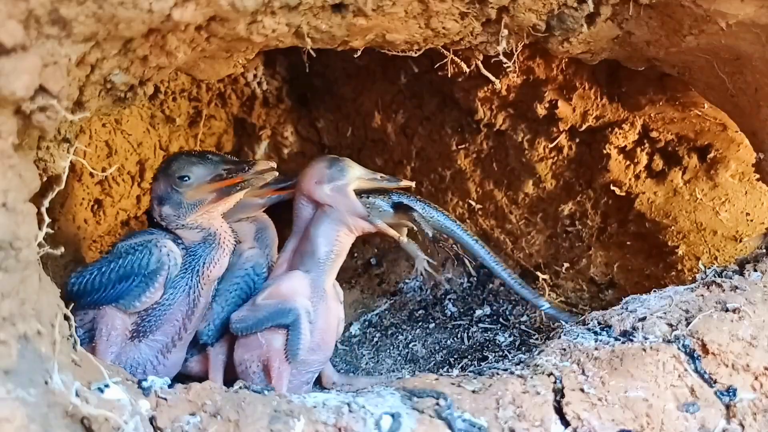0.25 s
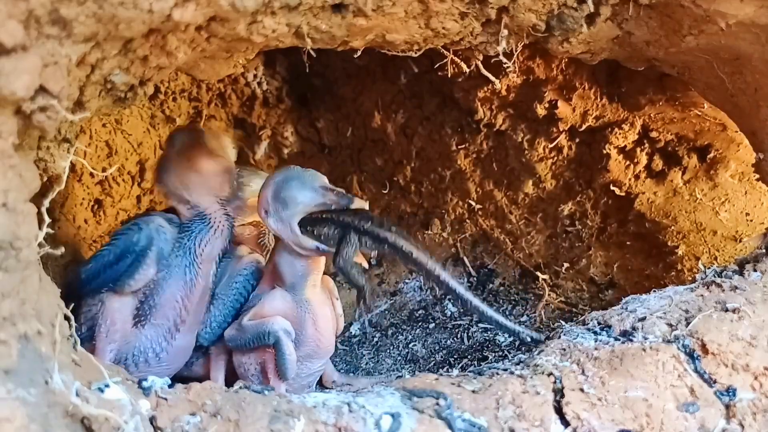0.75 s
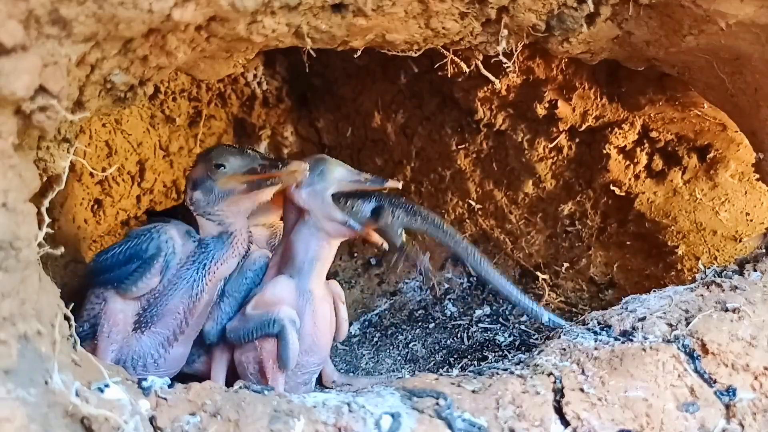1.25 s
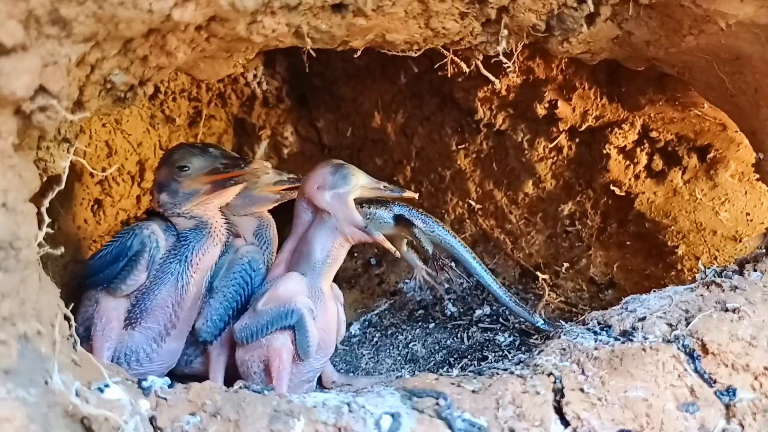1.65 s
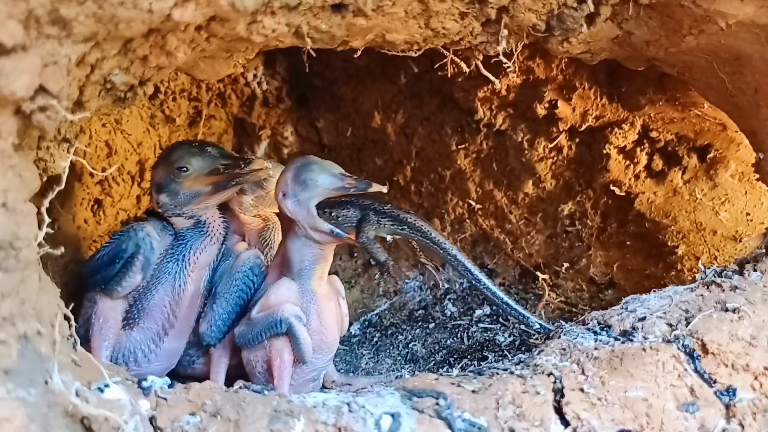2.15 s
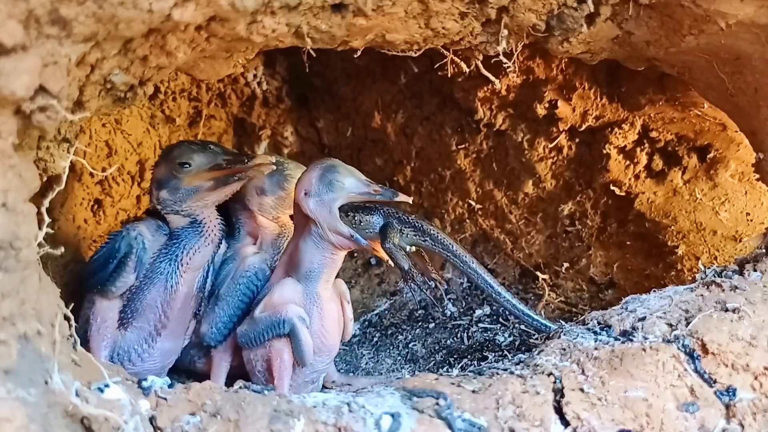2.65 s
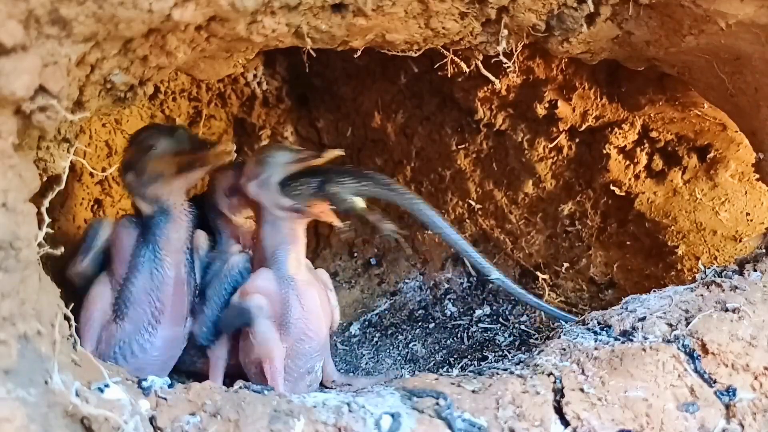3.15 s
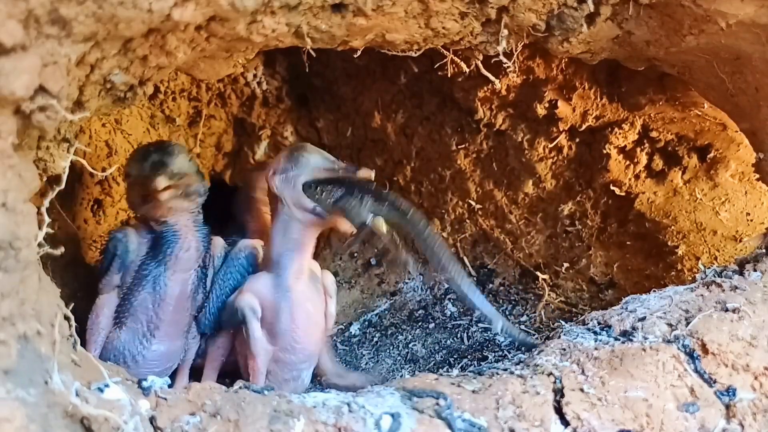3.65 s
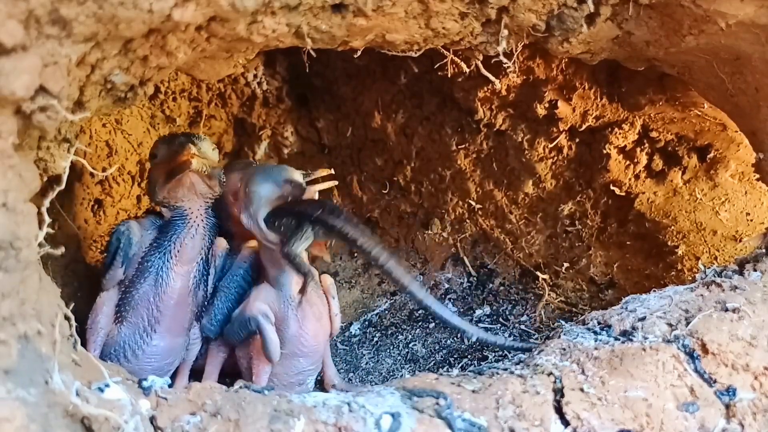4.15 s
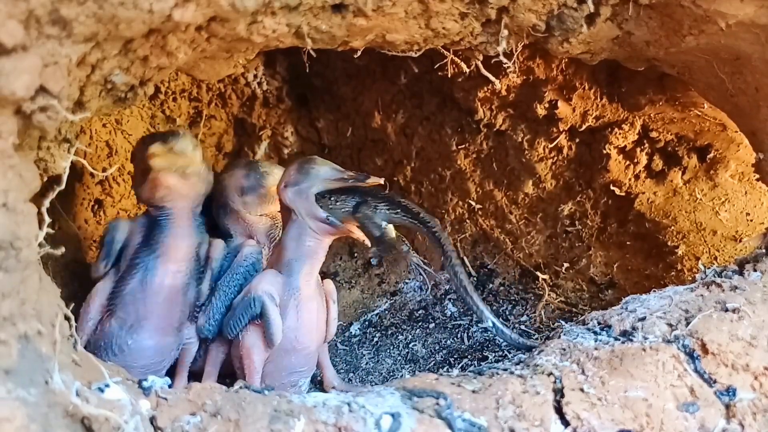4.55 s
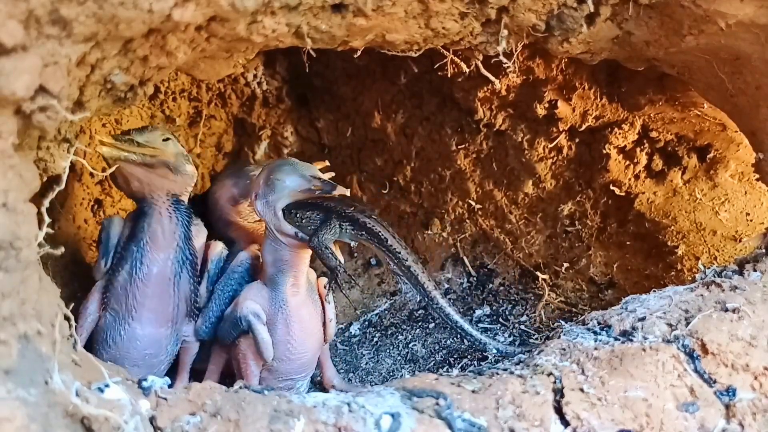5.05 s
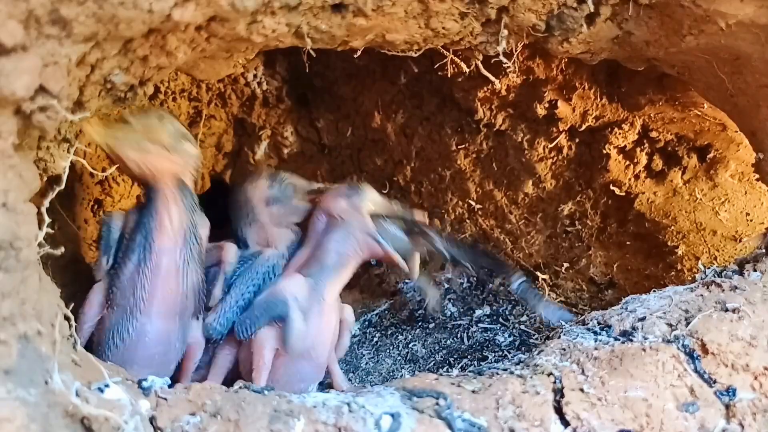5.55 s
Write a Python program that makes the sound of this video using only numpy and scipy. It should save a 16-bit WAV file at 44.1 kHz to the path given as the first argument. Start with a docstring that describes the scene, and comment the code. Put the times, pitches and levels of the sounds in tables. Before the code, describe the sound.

A close, wide outdoor stereo pickup of two or three young birds begging in an earth burrow. From 0 to about 1.5 seconds their shrill, hoarse whistles overlap in a dense, nearly unbroken chatter, with a more sustained buzzy squeal around 0.6 to 0.9. From 1.7 onward the calls become short, rasping chirps that leap up and fall, repeated several times a second with small gaps, crowding together again around 3 to 3.6 seconds and near the end. Breathy noise clings to each cry, and the walls add only a tiny, dry tail. A faint tap comes at 1.0, a clearer dull double bump near 3.0 to 3.2, and lighter touches at 4.3 and 5.2. Underneath, soft air and a low, uneven engine throb persist; the rumble rises after 3 seconds and is strongest at the close, about 5.8. Faint distant hoots appear at 3.1 to 3.6 and after 5.

```python
"""Begging nestlings in an earth burrow

Two or three hoarse, warbling, kingfisher-like whistles overlap in bursts: gliding harmonic tones,
modulated by narrow-band noise and weighted by the throat. Coloured breath noise follows their loudness,
and a short diffuse tail stands for the earth walls. Damped sines are bodies bumping the soil;
outside are an engine of pulses ringing resonances, a far bird's gliding sine hoots and steady air noise."""
import sys
import numpy as np
from scipy import signal
from scipy.fft import rfft, irfft, next_fast_len
from scipy.io import wavfile
from scipy.ndimage import uniform_filter1d

SR = 44100
rng = np.random.default_rng(int(sys.argv[2]) if len(sys.argv) > 2 else 0)


def wav_record(signal):
    """Record a signal, one row per channel, as 16-bit PCM in the file named by sys.argv[1]."""
    frames = np.transpose(np.atleast_2d(signal))
    bounded = np.clip(frames, -1, 1)
    # unit amplitude maps onto the largest positive 16-bit level
    quanta = np.round(bounded * 32767).astype(np.int16)
    wavfile.write(sys.argv[1], SR, quanta)


N = 255339

# Outside air. Each row: frequency in Hz, relative density in dB per Hz.
AIR_SPECTRUM = [(20, -8), (60, 3.5), (300, -13), (500, -13), (2000, -23), (5000, -20.5), (8000, -35.5),
                (16000, -22)]
AIR_DB = -53.5

# Engine loudness. Each row: time in seconds, level in dB before swell and stereo weights.
ENGINE_LEVEL = [(0, -46), (.9, -47.5), (1.3, -51.5), (2, -46), (2.5, -48), (3.3, -41.5), (4.2, -40.5),
                (5.2, -43), (5.79, -36)]
# Exhaust resonances. Each row: frequency in Hz, bandwidth in Hz, relative gain in dB.
EXHAUST_MODES = [(59, 9.6, -6.5), (79, 36, -5), (111.2, 19.7, -3), (132.6, 3.7, 6), (152.9, 11.6, -1.5),
                 (204, 40, -7), (297, 117, -15)]
FIRING_HZ = 26.1  # mean rate
SURGE_DB, MISFIRE_DB = 2.0, 4.0  # rms spread of the slow swell and from pulse to pulse

# Far bird. Each row: start in seconds, end in seconds, first Hz, last Hz, level in dB.
HOOTS = [(3.058, 3.115, 1160, 980, -46), (3.36, 3.394, 980, 990, -46), (3.523, 3.573, 1093, 1085, -51),
         (5.146, 5.212, 1050, 1114, -53), (5.057, 5.11, 955, 1120, -52), (5.25, 5.278, 980, 960, -54),
         (5.396, 5.44, 950, 1000, -54), (5.487, 5.54, 947, 1250, -47), (5.644, 5.706, 1073, 1080, -49.5)]
# Contacts with the soil. Each row: start in seconds, envelope peak in dB, pitch in Hz.
BUMPS = [(1.0, -37, 1450), (2.953, -35, 483), (3.133, -29, 266), (3.187, -39, 1454), (4.285, -39.5, 420),
         (5.239, -44, 1360)]

# Burrow mouth to two microphone ports. Each row: frequency in Hz, left minus right in dB,
# lag of the left in radians.
PORT_RESPONSE = [(106.2, -3, .1), (520, -2.5, 2.2), (1120, 3.5, 3.77), (2050, 1, 3.45), (2800, -6, 1.92),
                 (3240, -1.5, 2.69), (3340, 9, 0.38), (4100, 10.5, 1.5), (4590, 1.5, 1.41),
                 (5480, 2.5, 0.98), (6460, -2.5, 2.28), (11200, 3, 2.74)]
BURROW_T60_S, BURROW_DB = 0.05, -8.5  # decay time of the tail, its gain against the direct sound

# Breath against the loudness of the voices. Each row: time in seconds, hoarse part in dB,
# thin hiss in dB, low rasp in dB.
BREATH_LEVELS = [(0, -1, -30.5, -31), (.55, -6, -23.5, -48), (.62, -15.5, -43, -50), (.75, -17, -38, -21),
                 (.95, -15, -71.5, -41.5), (1.4, -13, -27, -55), (2, -6, -27.5, -59), (2.7, -6, -28, -46.5),
                 (3.4, -3, -41, -38.5), (4, -6, -31, -47.5), (4.6, -8, -34, -48), (5.25, -4, -27, -42.5),
                 (5.79, 0.5, -40.5, -31.5)]
# Thin hiss. Each row: frequency in Hz, relative density in dB per Hz.
HISS_SPECTRUM = [(5000, -12), (6500, 6), (8200, -8), (9500, -13.5), (11800, 4), (13500, -7.5), (15800, -2)]
# Low rasp. Each row: frequency in Hz, relative density in dB per Hz.
RASP_SPECTRUM = [(400, -14), (600, -1), (1500, -1), (2200, 5), (2800, -16), (5500, -2.5), (8300, -7.5),
                 (8900, -37.5)]
# Rms level spread and corner frequency of each kind of breath.
HOARSE_GRAIN_DB, HOARSE_GRAIN_HZ = 3.5, 250
GUST_DB, GUST_HZ = 3.5, 23
RASP_GUST_DB, RASP_GUST_HZ = 2, 15

# Throat and open bill. Each row: frequency in Hz, gain in dB.
THROAT = [(1600, -35), (2100, -14), (2500, -10.5), (2800, -1), (3100, 3), (3400, -1.5), (3650, 2),
          (3900, -1.5), (4150, -11.5), (4450, 1.5), (4750, -6), (5100, -8.5), (5500, -14.5), (6100, -21),
          (7000, -21), (9500, -31), (11200, -34), (12200, -16.5), (13300, -71.5), (16000, -43)]
# Arches of the voice; one that starts near the end of the row above carries the same whistle on.
# Each row: start, top and end in seconds, first, top and last pitch in Hz, fundamental level at the top
# and at the end in dB, octave level in dB; levels are before pitch-dependent gains and the throat.
ARCHES = [ (0.005, 0.05, .101, 2660, 3787, 2477, -30.5, -19.5, -14),
          (0.107, 0.161, .216, 2490, 3617, 2668, -29, -22, -18.5),
          (0.212, 0.272, .33, 2668, 3923, 3527, -21.5, -30.5, -25),
          (0.329, 0.322, .368, 3600, 3690, 1980, -36, -21.5, -23),
          (.032, 0.032, .075, 3900, 3844, 3360, -22, -41, -5),
          (0.119, 0.18, .18, 3350, 3750, 3770, -22.5, -34, -7),
          (.172, 0.158, .21, 3200, 3206, 1904, -46.5, -25, -25.5),
          (0.286, 0.314, .35, 3130, 3240, 1967, -26.5, -21, -17),
          (.457, 0.497, .56, 2880, 3750, 2830, -24.5, -35, -18),
          (0.501, 0.508, .545, 3710, 3584, 2625, -34.5, -16, -12.5),
          (0.559, 0.542, .585, 2560, 2634, 2580, -23, -29, -29),
          (.585, 0.625, .63, 2430, 3080, 3050, -32, -34, -35),
          (.588, 0.599, .61, 3922, 3812, 3720, -8, -16, -15),
          (0.601, 0.611, .624, 3720, 3822, 3780, -32, -21.5, 4),
          (0.628, 0.638, .664, 3676, 3710, 3297, -11.5, -18, -26.5),
          (0.665, 0.674, .717, 3284, 3381, 3154, -4.5, -18, -9),
          (.717, 0.715, .745, 3139, 3147, 3205, -15.5, -14.5, -10),
          (0.741, 0.822, .905, 3204, 3466, 3165, -10.5, -16, -21),
          (0.68, 0.694, .708, 2950, 2840, 2180, -23, -10, -19),
          (0.895, 0.896, .915, 2620, 2780, 1830, -16.5, -18, -31),
          (0.905, .932, .951, 3160, 3582, 3434, -26.5, -22, -36),
          (.951, 0.984, .99, 3437, 3730, 4070, -36, -7, -8),
          (1.006, 1.016, 1.085, 3634, 3760, 3596, -10.5, -23.5, -9),
          (1.087, 1.097, 1.108, 3630, 3740, 3300, -13, -22, -32.5),
          (1.017, 1.028, 1.108, 3630, 3670, 1580, -20.5, -22, -22.5),
          (1.178, 1.191, 1.21, 3063, 3723, 3664, -17.5, -24.5, -38),
          (1.206, 1.218, 1.253, 3734, 3710, 3510, -21.5, -36, -38),
          (1.18, 1.206, 1.27, 3400, 3710, 1880, -25.5, -22.5, -25),
          (1.285, 1.327, 1.377, 2890, 3258, 2730, -28, -28, -20),
          (1.38, 1.402, 1.435, 2660, 3140, 2297, -25, -23.5, -16),
          (1.327, 1.38, 1.462, 3430, 3688, 2868, -24, -25.5, -14),
          (1.469, 1.507, 1.535, 2938, 3192, 3075, -20, -23.5, -26),
          (1.522, 1.536, 1.603, 3090, 3113, 2000, -18.5, -40, -26.5),
          (1.678, 1.728, 1.775, 2710, 3886, 2884, -34, -23.5, -25),
          (1.751, 1.794, 1.825, 2630, 3941, 3610, -18.5, -16, -11.5),
          (1.809, 1.813, 1.85, 3520, 3610, 1990, -43.5, -20, -24.5),
          (1.943, 1.981, 2.043, 2772, 3660, 1920, -25, -26, -21.5),
          (2.0, 2.027, 2.1, 3520, 3560, 2627, -23, -29, -16.5),
          (2.098, 2.192, 2.198, 2616, 3508, 3370, -26, -10, -22.5),
          (2.13, 2.172, 2.26, 2660, 3200, 1918, -21, -30.5, -21.5),
          (2.355, 2.432, 2.438, 2996, 3770, 3790, -31, -52.5, -34.5),
          (2.372, 2.417, 2.468, 2364, 3530, 1860, -25, -23, -24),
          (2.573, 2.609, 2.682, 3054, 3610, 2310, -30.5, -28.5, -30),
          (2.684, 2.762, 2.79, 2310, 3817, 3610, -36.5, -28.5, -27),
          (2.717, 2.751, 2.815, 2976, 3677, 1915, -23, -25, -20),
          (2.877, 2.907, 2.96, 2939, 4020, 2480, -25.5, -24, -27),
          (2.963, 3.006, 3.095, 2460, 3878, 2135, -17, -24, -22),
          (2.993, 2.995, 3.058, 3785, 3775, 3710, -61, -24, -21),
          (3.056, 3.053, 3.079, 2810, 2752, 2628, -11.5, -29.5, -14),
          (3.072, 3.126, 3.125, 2585, 4007, 3885, -22, -13, -21),
          (3.141, 3.139, 3.2, 3810, 3690, 2100, -31.5, -23.5, -20),
          (3.187, 3.218, 3.279, 2821, 3425, 2485, -19, -18.5, -17),
          (3.281, 3.337, 3.383, 2485, 3310, 2929, -22, -17.5, -28),
          (3.384, 3.424, 3.46, 2989, 3466, 2867, -18.5, -19.5, -13.5),
          (3.457, 3.497, 3.575, 2877, 3388, 1999, -24, -31, -25.5),
          (3.39, 3.415, 3.44, 3310, 3580, 3240, -21.5, -33, -20),
          (3.459, 3.497, 3.56, 3130, 3390, 2153, -17.5, -20.5, -10.5),
          (3.73, 3.758, 3.838, 2846, 3774, 1650, -25, -22.5, -16.5),
          (3.773, 3.766, 3.834, 3620, 3622, 2800, -21, -25.5, -10),
          (3.83, 3.879, 3.933, 2800, 3720, 3637, -28.5, -22.5, -21),
          (3.891, 3.907, 3.985, 3416, 3490, 1940, -18.5, -22.5, -12.5),
          (4.014, 4.049, 4.12, 3435, 4690, 2082, -34, -29, -14),
          (4.074, 4.113, 4.16, 2806, 3410, 1923, -22, -26.5, -23),
          (4.24, 4.287, 4.343, 3020, 3776, 2335, -23.5, -23.5, -25.5),
          (4.333, 4.398, 4.475, 2335, 3910, 2024, -22.5, -31, -20.5),
          (4.498, 4.53, 4.595, 2646, 3457, 1990, -21.5, -25.5, -22),
          (4.668, 4.702, 4.753, 2662, 3594, 2263, -25.5, -22, -18.5),
          (4.7, 4.723, 4.783, 3575, 3690, 2560, -32, -22, -16),
          (4.787, 4.845, 4.85, 2560, 3700, 3700, -30.5, -31, -17.5),
          (4.827, 4.822, 4.91, 3625, 3594, 2000, -25, -23, -22),
          (4.864, 4.861, 4.93, 3010, 3080, 2353, -15, -31, -32.5),
          (4.978, 5.035, 5.083, 2690, 4600, 1944, -26.5, -25, -22),
          (5.032, 5.075, 5.116, 2750, 3516, 1930, -23, -22.5, -18.5),
          (5.188, 5.223, 5.26, 3014, 4100, 3470, -24, -24.5, -31),
          (5.241, 5.284, 5.345, 2760, 3153, 1996, -19, -26, -19.5),
          (5.294, 5.321, 5.395, 3540, 3718, 2317, -21, -37, -16.5),
          (5.438, 5.484, 5.544, 2824, 3200, 2550, -22.5, -21.5, -31),
          (5.545, 5.593, 5.693, 2550, 3053, 2030, -23.5, -19, -18.5),
          (5.463, 5.551, 5.629, 3590, 3724, 2267, -25, -21, -24),
          (5.637, 5.693, 5.76, 2267, 4060, 2082, -39, -27.5, -22), ]
JOIN_S, JOIN_SHARE = .014, .11  # gap in seconds and in pitch ratio that still counts as one whistle
RISE_BEND, FALL_BEND = 1.6, 1.9  # flatness of an arch's top at the whistle's ends (1 = pointed)
ONSET_DB = -6  # start of a whistle against its first top
PUSH_UNDER_HZ, PUSH_DB_PER_KHZ = 2484, 21  # extra effort at low pitch
OCTAVE_PIVOT_HZ, OCTAVE_DB_PER_KHZ = 2600, -20  # the octave thins above the pivot
FLARE_HZ, FLARE_WIDTH_HZ, FLARE_DB = 2370, 100, 9  # and flares around this pitch
# Roughness of the voices at a given strain. Each row: time in seconds, roughness from 0 to 1.
ROUGHNESS = [(.56, 1), (.59, .25), (.68, .5), (.76, 1), (.9, 1), (.94, .4), (1.02, .6), (1.3, 1), (1.43, 1),
             (1.47, .3), (1.7, .4), (1.78, 1), (3.99, 1), (4.03, .25), (4.07, .4), (4.12, 1), (4.33, .9),
             (4.39, .3), (4.5, .8), (4.97, .6), (5.1, .8), (5.5, .9)]
FLUTTER_DEPTH, SIDE_TONE_DEPTH = .58, .27  # rms at full strain and roughness, before power is evened out
JITTER = .03  # rms share of pitch at full strain and roughness
BREATHY_WITH_STRAIN = 1.5  # exponent: a strained voice lets through more breath
# Third to fifth harmonic against the fundamental. Each entry: level in dB before the throat.
UPPER_DB = [-11.5, -6, -7.5]
OVERTONE_PATCH_DB, OVERTONE_PATCH_HZ = 5, 30  # overtones come and go: rms spread, corner frequency


def amp(db):
    """An amplitude ratio is ten to the power of decibels over twenty."""
    return 10 ** (np.asarray(db) / 20)


def unit(x):
    """Division by the root mean square gives unit power."""
    return x / np.sqrt(np.mean(x ** 2) + 1e-20)


def in_time(rows, t):
    """Linear interpolation turns sparse rows into continuous control curves."""
    s, *columns = np.transpose(rows)
    return [np.interp(t, s, column) for column in columns]


def at_hz(points, hz, axis=1):
    """Spectral columns are interpolated along logarithmic frequency."""
    points = np.array(points)
    return np.interp(np.log(hz + 1), np.log(points[:, 0]), points[:, axis])


def wobble(hz, size=N):
    """Two equal one-pole low-passes turn white noise into a slow fluctuation of unit rms."""
    r = np.exp(-2 * np.pi * hz / SR)
    settle = 4000  # samples dropped while the filter settles
    white = rng.standard_normal(size + settle)
    return unit(signal.lfilter([1], [1, -2 * r, r * r], white)[settle:])


def noise(spectrum, alike):
    """A shared noise component sets the correlation of two spectrally shaped channels; joint rms 1."""
    common, left, right = rng.standard_normal((3, N))
    alike = np.clip(alike, 0, 1)
    pair = np.sqrt(alike) * common + np.sqrt(1 - alike) * np.array([left, right])
    hz = np.arange(N // 2 + 1) * SR / N
    return unit(irfft(rfft(pair) * amp(at_hz(spectrum, hz)), N))


def resonance(x, hz, width_hz):
    """A damped mode is a two-pole band-pass with about unit gain at its peak."""
    r = np.exp(-np.pi * width_hz / SR)
    zeros = np.array([1, 0, -1]) * (1 - r * r) / 2
    poles = [1, -2 * r * np.cos(2 * np.pi * hz / SR), r * r]
    return signal.lfilter(zeros, poles, x)


def outside_air():
    """Random pressure with little correlation between the sides makes a steady, wide air noise."""
    return amp(AIR_DB) * noise(AIR_SPECTRUM, alike=0.2)


def engine(rough, uneven_db):
    """Uneven firing pulses and turbulence excite the exhaust's resonant modes; rms 1."""
    turns = np.cumsum(FIRING_HZ * (1 + 0.0083 * wobble(3))) / SR
    fires = np.diff(np.floor(turns), prepend=0) > 0
    pulses = unit(fires * amp(uneven_db * rng.standard_normal(N)))
    drive = pulses + rough * rng.standard_normal(N)
    modes = np.zeros(N)
    for k, (hz, width_hz, db) in enumerate(EXHAUST_MODES):
        modes += (-1) ** k * amp(db) * resonance(drive, hz, width_hz)  # alternating polarity
    return unit(signal.sosfilt(signal.butter(4, 330, fs=SR, output="sos"), modes))


def engine_rumble(t):
    """Two independent engine signals reach the sides in different shares, as by two paths."""
    first, second = [engine(rough=1.36, uneven_db=MISFIRE_DB) for path in range(2)]
    level = amp(in_time(ENGINE_LEVEL, t)[0] + SURGE_DB * wobble(1.35))
    return level * (first * amp([[2.5], [-3]]) + second * [[-.2], [.3]])


def hoots():
    """A sine of linearly gliding frequency swells and fades as a soft hoot."""
    out = np.zeros(N)
    for start, end, first_hz, last_hz, db in HOOTS:
        span = np.arange(round(start * SR), round(end * SR))
        glide = np.linspace(first_hz, last_hz, len(span))
        swell = np.sqrt(np.hanning(len(span)))
        out[span] = amp(db) * swell * np.sin(2 * np.pi * np.cumsum(glide) / SR)
    return out


def bumps(fade_s):
    """A soft contact is a heavily damped swing whose envelope peaks after one time constant."""
    out, t = np.zeros(N), np.arange(2000) / SR
    envelope = np.e * t / fade_s * np.exp(-t / fade_s)
    for s, db, hz in BUMPS:
        at = round(s * SR)
        out[at:at + 2000] += amp(db) * np.sin(2 * np.pi * hz * t) * envelope
    return out


def burrow(x):
    """Direct sound differs in level and phase by port; wall reflections form a decaying diffuse tail."""
    size = next_fast_len(N + 8192)
    hz = np.arange(size // 2 + 1) * SR / size
    # averaged over about 150 Hz
    balance_db, lag = (uniform_filter1d(at_hz(PORT_RESPONSE, hz, axis=c), size=900) for c in (1, 2))
    ratio = amp(balance_db)
    right = np.sqrt(2 / (1 + ratio ** 2))  # keeps the summed power of the ports constant
    direct = np.array([right * ratio * np.exp(-1j * lag), right + 0j])
    t = np.arange(6000) / SR
    tail = rng.standard_normal((2, len(t))) * amp(-60 * t / BURROW_T60_S) * (t > .0015)
    tail /= np.linalg.norm(tail, axis=1, keepdims=True)
    tail = rfft(tail, size) * abs(direct)
    return irfft(rfft(x, size) * (direct + amp(BURROW_DB) * tail), size)[:, :N]


def breath(t, loudness):
    """Turbulent flow gives hoarse, hissing and rasping noise that grows with the voices' loudness."""
    hoarse_db, hiss_db, rasp_db = in_time(BREATH_LEVELS, t)
    hoarse_spectrum = THROAT[:15] + [(9000, -60)]  # stops under the top throat resonance
    hoarse = amp(hoarse_db + HOARSE_GRAIN_DB * wobble(HOARSE_GRAIN_HZ)) * loudness ** 1.093
    hiss = amp(hiss_db + GUST_DB * wobble(GUST_HZ)) * loudness ** 0.82
    rasp = amp(rasp_db + RASP_GUST_DB * wobble(RASP_GUST_HZ)) * loudness ** 0.63
    hoarse = hoarse * noise(hoarse_spectrum, alike=1.0)
    hiss = hiss * noise(HISS_SPECTRUM, alike=0.072)
    return hoarse + hiss + rasp * noise(RASP_SPECTRUM, alike=0.14)


def phrases():
    """Continuity of time and pitch joins arches into whistles; neighbours meet halfway."""
    rows = np.array(ARCHES)
    near_in_time = abs(rows[1:, 0] - rows[:-1, 2]) < JOIN_S
    near_in_pitch = abs(rows[1:, 3] / rows[:-1, 5] - 1) < JOIN_SHARE
    joined = near_in_time & near_in_pitch
    for k in np.flatnonzero(joined):
        meeting = (rows[k, [2, 5]] + rows[k + 1, [0, 3]]) / 2
        rows[k, [2, 5]] = rows[k + 1, [0, 3]] = meeting
    return np.split(rows, np.flatnonzero(~joined) + 1)


def contour(arches, t):
    """Pitch arches through each top with rounded dips; effort and pitch set the harmonic levels."""
    which = np.searchsorted(arches[1:, 0], t)
    start, top, end, first_hz, top_hz, last_hz, _, _, octave_db = arches[which].T
    before = np.clip((top - t) / np.maximum(top - start, 1e-4), 0, 1)
    after = np.clip((t - top) / np.maximum(end - top, 1e-4), 0, 1)
    rise = np.where(which == 0, before ** RISE_BEND, np.sin(np.pi / 2 * before) ** 2)
    fall = np.where(which == len(arches) - 1, after ** FALL_BEND, np.sin(np.pi / 2 * after) ** 2)
    pitch = top_hz - (top_hz - first_hz) * rise - (top_hz - last_hz) * fall
    effort_s = [t[0], *arches[:, 1:3].ravel()]
    effort_db = np.interp(t, effort_s, [arches[0, 6] + ONSET_DB, *arches[:, 6:8].ravel()])
    first_db = effort_db + PUSH_DB_PER_KHZ * np.maximum(PUSH_UNDER_HZ - pitch, 0) / 1000
    flare_db = FLARE_DB * np.exp(-((pitch - FLARE_HZ) / FLARE_WIDTH_HZ) ** 2)
    thinning_db = OCTAVE_DB_PER_KHZ * np.maximum(pitch - OCTAVE_PIVOT_HZ, 0) / 1000
    return pitch, first_db, octave_db + flare_db + thinning_db


def whistles(flutter_hz, strain_hz, depth, grit, jitter, upper_db, edge_s):
    """The syrinx flutters more at high pitch, modulating harmonics; returns sound and loudness."""
    out, power = np.zeros(N), np.zeros(N)
    flutter = unit(resonance(rng.standard_normal(N), flutter_hz, 33))
    shake = wobble(340)
    side_tone = unit(resonance(rng.standard_normal(N), 350, 110))  # a second vibration adds side tones
    patch_db = OVERTONE_PATCH_DB * wobble(OVERTONE_PATCH_HZ)
    for k, rows in enumerate(phrases()):
        span = np.arange(round(rows[0, 0] * SR), min(N, round(rows[-1, 2] * SR)))
        t = span / SR
        curves = contour(rows, t)
        pitch, first_db, second_db = (uniform_filter1d(c, size=250, mode="nearest") for c in curves)
        strain = np.clip((pitch - strain_hz) / 600, .3, 1)
        rough = strain * in_time(ROUGHNESS, t)[0]
        own = (span + 9001 * k) % N  # each whistle reads the fluctuations at its own offset
        swell = 1 + rough * (depth * flutter[own] + grit * side_tone[own])
        swell /= np.sqrt(1 + rough ** 2 * (depth ** 2 + grit ** 2))  # evens out mean power
        phase = 2 * np.pi * np.cumsum(pitch * (1 + jitter * rough * shake[own])) / SR
        edges = np.clip(np.minimum(t - t[0], t[-1] - t) / edge_s, 0, 1)
        second_db = second_db + patch_db[own] * rough
        upper = first_db + patch_db[own]
        harmonics = [first_db, second_db] + [upper + db for db in upper_db]
        for order, db in enumerate(harmonics, 1):
            hz = order * pitch
            level = edges * amp(db + at_hz(THROAT, hz)) * (hz < .45 * SR)
            out[span] += np.sqrt(2) * level * swell * np.sin(order * phase)
            power[span] += level ** 2 * strain ** BREATHY_WITH_STRAIN
    return out, np.sqrt(uniform_filter1d(power, size=450).clip(0))


def scene():
    """Superposition adds the burrow's voices, breath and bumps to the engine, far bird and air."""
    t = np.arange(N) / SR
    voices, loudness = whistles(flutter_hz=143, strain_hz=2977, depth=FLUTTER_DEPTH,
                                grit=SIDE_TONE_DEPTH, jitter=JITTER, upper_db=UPPER_DB, edge_s=0.0024)
    near = burrow(voices + breath(t, loudness)) + bumps(fade_s=0.0012)
    outside = engine_rumble(t) + hoots() * [[1], [.3]] + outside_air()
    return near + outside


def record(dry):
    """Saturation rounds the peaks; a steep low-pass, 70 dB down at 16150 Hz, removes the top."""
    rounded = 1.614 * np.tanh(dry / 1.98)
    return signal.sosfilt(signal.cheby2(24, 70, 16150, fs=SR, output="sos"), rounded)


dry = scene()
out = record(dry)
wav_record(out)
```